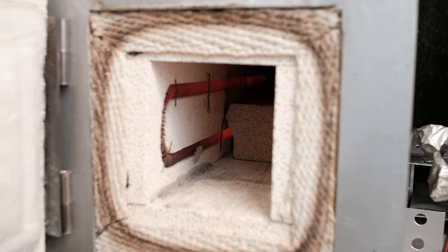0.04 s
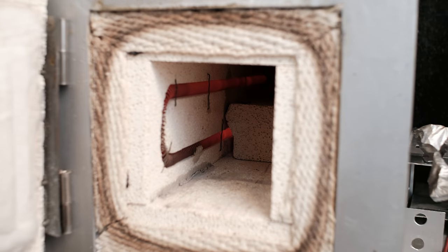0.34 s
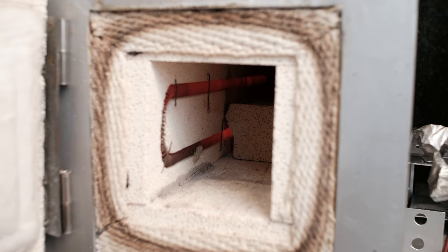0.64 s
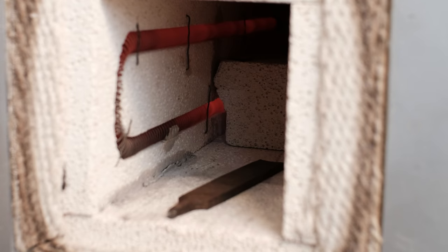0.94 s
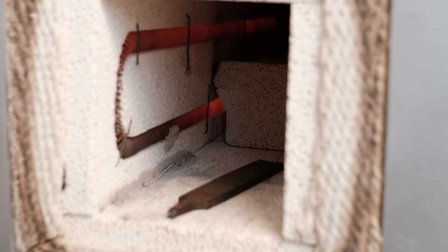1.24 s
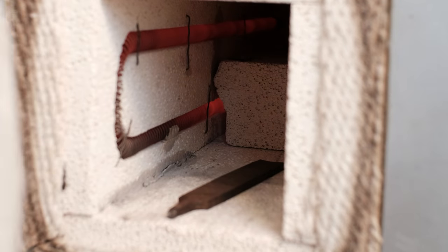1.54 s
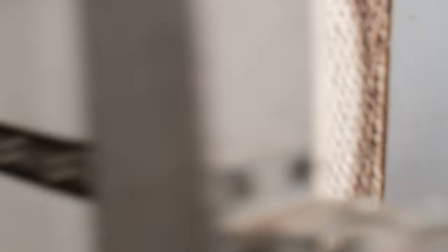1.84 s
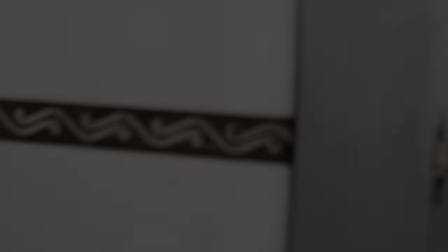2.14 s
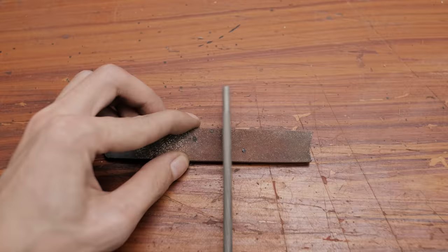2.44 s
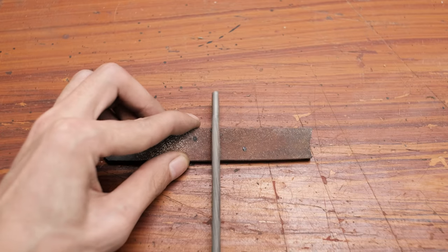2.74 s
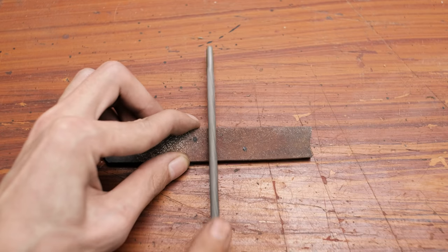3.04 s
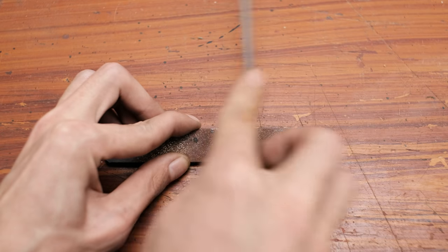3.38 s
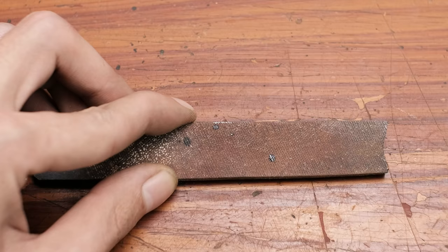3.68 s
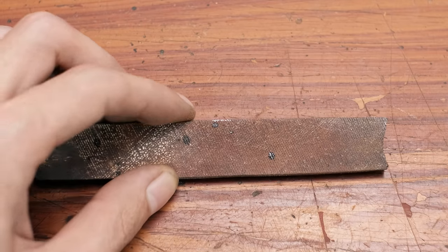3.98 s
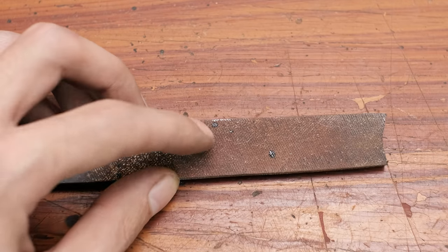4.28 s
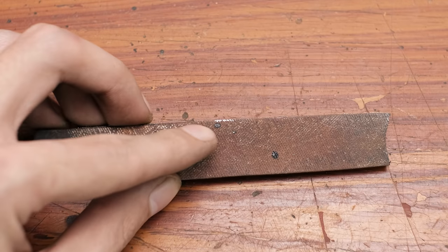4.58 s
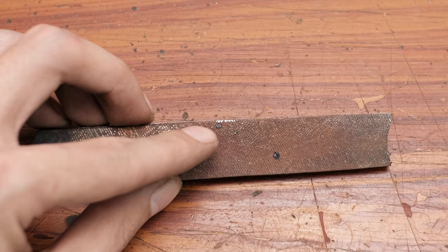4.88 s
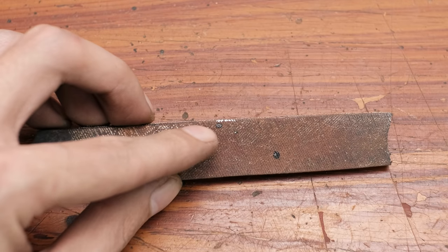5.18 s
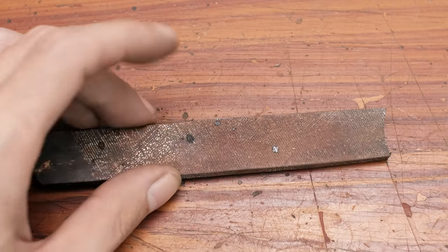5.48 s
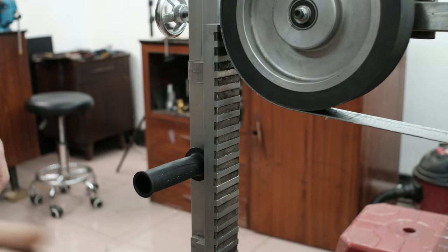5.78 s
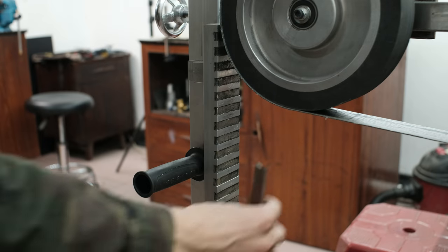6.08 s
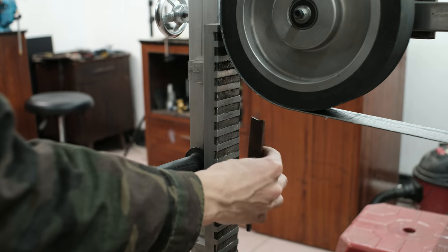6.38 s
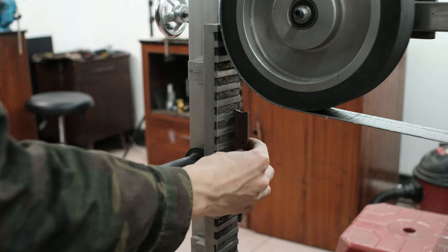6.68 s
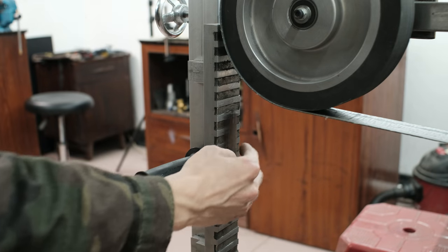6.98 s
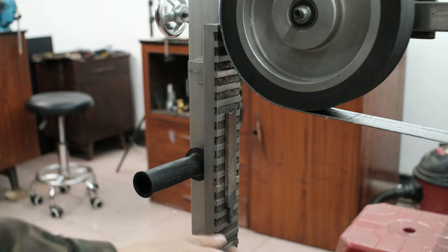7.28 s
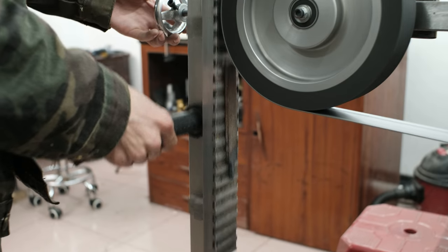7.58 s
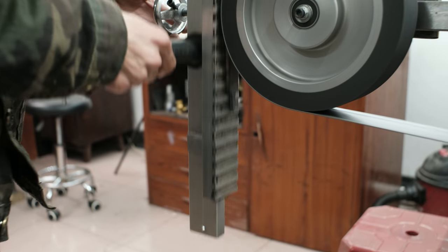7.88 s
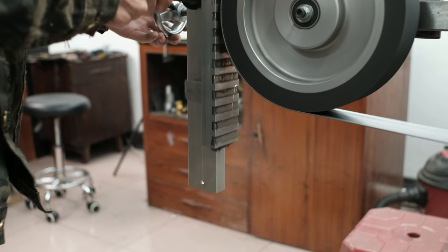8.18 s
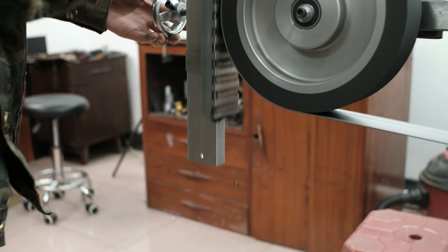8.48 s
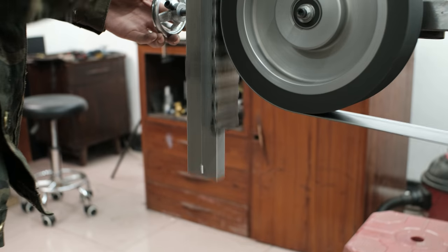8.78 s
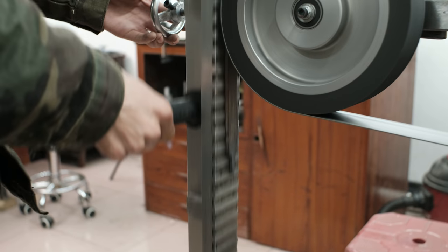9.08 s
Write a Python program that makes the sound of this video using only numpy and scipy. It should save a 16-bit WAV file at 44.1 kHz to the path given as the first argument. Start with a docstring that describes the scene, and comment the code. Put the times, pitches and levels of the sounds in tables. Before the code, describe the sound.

In a small workshop, a sleeve rustles faintly and a piece of steel bounces and rings on a kiln's brick floor. A brief squeak and a soft door swish follow. A round file rasps once across steel on a wooden bench, then come two light knocks. The steel snaps onto a magnetic slide with two sharp clacks. A belt grinder starts abruptly, rushing loudly over motor hum, and cuts twice with hiss and chatter.

```python
"""Knife making in a small workshop. Sleeve and hand rustle faintly; a piece of an old file bounces and
rings on a kiln's brick floor. A short squeak; the door swings shut with a swish and a low gust. On a
wooden bench a round file rasps once across the steel, and fingers set it straight with two knocks.
A sleeve swishes and the steel snaps onto the magnetic slide of a belt grinder. The belt starts, rushing
over motor hum, and its grit bites the steel on two passes with hiss and chatter."""
import sys
import numpy as np
from scipy import signal
from scipy.fft import rfft, irfft
from scipy.io import wavfile
from scipy.ndimage import map_coordinates

SR = 44100
rng = np.random.default_rng(int(sys.argv[2]) if len(sys.argv) > 2 else 0)


def master_out(mix):
    """Clip the mix to full scale and print it as 16-bit PCM to the path in sys.argv[1]."""
    frames = np.transpose(np.atleast_2d(mix))
    ceiling = np.clip(frames, -1, 1)
    pcm = np.round(ceiling * 32767).astype(np.int16)
    wavfile.write(sys.argv[1], SR, pcm)


N = 407043
TIME = np.arange(N) / SR

# background at kiln, bench, grinder: (air [dB], rumble [dB])
BACKGROUNDS = [(-65, -58), (-71, -71.5), (-68.5, -62.5)]
# room air: (frequency [Hz], density [dB])
AIR_SPECTRUM = [(60, -9.5), (110, -6.5), (300, -9.5), (450, -13.5), (1200, -16), (1700, -23.5), (2800, -31),
                (6000, -34.5), (11500, -40), (13000, -49.5), (15500, -48)]
# low rumble: (frequency [Hz], density [dB])
RUMBLE_SPECTRUM = [(12, -2), (28, 9), (55, 1.5), (90, -6.5), (160, -27), (400, -54.5)]
# workshop reverberation: (frequency [Hz], t60 [s])
ROOM_T60 = [(150, 0.58), (900, 0.34), (2200, 0.21), (5000, 0.33), (9000, 0.26), (15000, 0.21)]

# sleeve and hand at the kiln, door, sleeve at the grinder: (peak [s], rise [s], fall [s], level [dB])
KILN_RUSTLES = [(.03, .1, .13, -78), (.38, .135, .19, -68.5), (.68, .098, .075, -70)]
DOOR_SWISHES = [(1.745, .16, .14, -65), (2.045, .086, .1, -57)]
SLEEVE_SWISHES = [(5.79, .09, .085, -61.5), (6.02, .09, .1, -68), (6.23, .21, .19, -65.5)]
# rustles and swishes at the kiln: (frequency [Hz], density [dB])
SWISH_SPECTRUM = [(710, -35), (1200, -1.5), (2360, -2), (3770, -5), (4980, -1.5), (9370, -16.5),
                  (15500, -29)]
# sleeve at the grinder: (frequency [Hz], density [dB])
CLOTH_SPECTRUM = [(710, -27.5), (1200, -4.5), (1700, -3.5), (1850, 0), (2080, -4.5), (5320, -3.5),
                  (15000, -25.5)]
# handling ticks: (time [s], level [dB])
TICKS = [(2.209, -40), (5.688, -34.5), (5.731, -33)]

# steel on kiln brick: (time [s], thud [dB], relative ring [dB], relative tick [dB])
KILN_BLOWS = [(0.7782, -9, -45, -28.5), (0.7878, -41, -35.5, -9.5), (0.7895, -5.5, -23, -16),
              (0.7943, -19, -44, -16), (.847, -15.5, -42.5, -25), (0.8523, -11, -26, -20),
              (0.86, -17, -59, -33), (.879, -19, -46, -34.5)]
# free steel: (frequency [Hz], gain [dB], t60 [s], choking by the brick [0-1])
FREE_STEEL_MODES = [(1420, -21, 0.67, 0.54), (1822, -19.5, .2, 0), (1840, -27.5, .3, 0.7),
                    (3512, 1.5, 0.8, 0.87), (5420, -18.5, 0.9, 0.36), (5660, -12, 0.36, .3),
                    (6140, -6, 0.37, 0.42), (9520, -11, 0.37, 1), (11200, -27, .35, 0.6),
                    (14050, -23.5, .3, .4)]
# brick thud: (frequency [Hz], density [dB])
BRICK_SPECTRUM = [(60, -26.5), (150, -8.5), (300, -8.5), (450, 4), (620, 5.5), (950, -8.5), (1400, -8.5),
                  (1800, -8.5), (2600, -16.5), (5000, -32), (15000, -60)]
# gritty tick on brick: (frequency [Hz], density [dB])
TICK_SPECTRUM = [(1000, -4.5), (3000, -1), (7000, 3.5), (11000, -11.5), (15500, -11.5)]

# two nudges, then the file: (start [s], end [s], relative push [dB], scrape [dB], bite [dB])
BENCH_STROKES = [(2.239, 2.298, -46.5, -53.5, -77), (2.305, 2.412, -54, -52, -64),
                 (2.813, 3.339, -24, -24.5, -36)]
# file catches (+) and skips (-): (time [s], gain [dB])
CATCHES = [(2.965, 4), (3.015, 2.5), (3.035, -6), (3.056, 6), (3.074, -8), (3.095, 7.5), (3.12, -5),
           (3.165, 2), (3.212, 1), (3.295, 4.5)]
# knocks on the bench: (time [s], relative wood [dB], relative steel [dB])
KNOCKS = [(2.258, -28.5, -65), (2.722, -35, -74), (2.7599, -20, -24), (2.831, -30.5, -34),
          (3.797, -37.5, -66), (3.9299, -14.5, -54), (3.949, -24, -65), (4.091, -34, -60),
          (4.0977, -20, -60)]
# wooden top: (frequency [Hz], width [Hz], gain [dB])
BENCH_MODES = [(196.6, 25, -0.5), (253, 53, -6), (362, 54, -1), (435, 43, 3.5), (494, 46, 1),
               (585.6, 21, -3.5), (679, 29, 2), (778, 44, -3), (940, 74, -4.5), (1235, 110, -9.5),
               (1479, 47, -10), (1750, 140, -19.5), (2220, 170, -22.5)]
# steel held on the bench: (frequency [Hz], width [Hz], gain [dB])
HELD_STEEL_MODES = [(3548, 60, 7.5), (4710, 200, -18), (5400, 450, -21.5), (6220, 53, -14),
                    (9600, 60, -12.5), (11460, 100, -20), (14200, 130, -35.5)]
# midrange scrape of the file: (frequency [Hz], density [dB])
SCRAPE_SPECTRUM = [(300, -24), (700, -0.5), (1100, 1), (1600, 4), (2200, -10.5), (3000, -14.5),
                   (5000, -25.5), (15000, -60.5)]
# bright rasp of the steel: (frequency [Hz], density [dB])
RASP_SPECTRUM = [(1500, 3), (2700, -10), (4500, -1.5), (6200, -12), (8000, -10.5), (11500, -24),
                 (13000, -27.5), (15500, -34.5)]
# soft fingertip knock: (frequency [Hz], density [dB])
FINGER_SPECTRUM = [(100, 1.5), (400, 0), (650, -10.5), (1200, -14), (5000, -15)]

# steel onto the magnet: (time [s], edge [dB], face [dB])
SNAPS = [(6.5595, 4, -36), (6.5762, 9, -9), (6.584, -2, -16.5), (7.0608, -14, 13), (7.0658, -17.5, -1)]
# steel on the slide: (frequency [Hz], width [Hz], edge gain [dB], face gain [dB])
SLIDE_MODES = [(480, 140, -6.5, -6.5), (600, 92, -2, -4.5), (864, 160, 1, -2.5), (1430, 230, 0, -5),
               (1860, 190, 1.5, -6.5), (2830, 800, -2.5, -3.5), (3670, 270, 3.5, -4.5), (4706, 207, 5, 0.5),
               (5600, 270, -1, -6.5), (6370, 170, -8, 4.5), (7020, 390, -6, -0.5), (7880, 710, -9.5, -4),
               (8250, 750, -12, -8), (9620, 280, -11.5, 2.5), (10620, 330, -18, -6),
               (11440, 140, -6.5, -3.5), (13100, 380, -35, -11), (14000, 350, -37, -12)]
# long rings of the slide's frame: (frequency [Hz], width [Hz], edge gain [dB], face gain [dB])
SLIDE_FRAME_MODES = [(187, 6.2, -2, -12.5), (318, 5.5, 1, -5), (570, 5, -8, -0.5), (875, 6.8, -1.5, 1.5),
                     (1030, 6, -2.5, -3.5), (1830, 2.5, -5.5, -21), (3680, 7, 5, -17.5),
                     (4830, 8.2, -2.5, -14), (5800, 6.1, -2.5, -22), (6700, 14, -14, 3)]
# heavy frame under edge and face blows: (frequency [Hz], density [dB])
KNOCK_SPECTRUM = [(60, -33), (170, 2.5), (300, 2.5), (1300, -9), (2200, -5.5), (6000, -22.5),
                  (15000, -39.5)]
THUMP_SPECTRUM = [(25, -3), (55, 7), (130, -8), (350, -1), (2500, 1), (10000, -20), (15000, -22.5)]

# belt rush: (frequency [Hz], density [dB])
BELT_SPECTRUM = [(35, -56), (60, -20), (96, -5.5), (135, -14), (196, -2.5), (259, -12), (385, -5.5),
                 (572, -15.5), (642, -10), (705, -10), (1050, -8), (2470, -11), (5080, -7), (10700, -18.5),
                 (15500, -35.5)]
# platen and wheel housing: (frequency [Hz], width [Hz], gain [dB])
HOUSING_MODES = [(161, 30, -1), (225.7, 6.1, 4.5), (390, 18, -13), (930, 570, -3.5), (3530, 90, -9.5),
                 (3890, 290, 5.5), (4620, 300, 0), (4927, 70, 10.5), (5300, 250, 4), (5710, 43, 10.5),
                 (5940, 98, 6)]
# motor, wheel and bearing tones: (frequency [Hz], rms level [dB])
MOTOR_TONES = [(33.1, -73), (99, -52), (660, -56), (753, -59.5), (802, -57.5), (1024, -55.5), (1109, -63.5),
               (4968, -74), (5828, -51)]
# contact wheel drone: (time [s], relative level [dB])
DRONE_LEVELS = [(7.42, -46), (7.538, -57), (7.568, -43), (7.904, -46), (7.93, -60), (8.018, -45),
                (8.078, -67), (8.248, -47.5), (8.59, -45.5), (8.624, -60), (8.714, -41), (8.882, -41.5),
                (8.922, -62), (9.2, -42)]
# steel against the belt: (start [s], end [s], first pressure [0-1], last pressure [0-1])
PASSES = [(7.998, 8.493, .22, .74), (8.855, 8.98, 0.58, 0.34)]
# belt snatches at the steel: (time [s], level [dB])
SNATCHES = [(8.126, -19), (8.275, -16), (8.388, -0.5), (8.455, -13), (8.505, -22), (8.878, -5),
            (8.951, -21)]
# grit cutting steel: (frequency [Hz], density [dB])
CUTTING_SPECTRUM = [(500, -3), (1500, -1.5), (4000, 6), (7000, 3), (10500, -2.5), (12300, -12), (13300, -6),
                    (15500, -11)]

BELT_START_S, LAPS_PER_S = 7.384, 11.78


def amp(db):
    """Decibels to gain."""
    return 10 ** (np.asarray(db) / 20)


def unit_rms(x):
    """Scale to rms 1."""
    return x / np.sqrt(np.mean(x ** 2) + 1e-20)


def ramp(start_s, length_s):
    """Linear rise from 0 to 1."""
    return np.clip((TIME - start_s) / length_s, 0, 1)


def since(time_s):
    """Seconds elapsed; 0 before."""
    return np.maximum(TIME - time_s, 0)


def swell(peak_s, rise_s, fall_s):
    """Bell of height 1; -10 dB at rise_s before and fall_s after the peak."""
    away = (TIME - peak_s) / np.where(TIME < peak_s, rise_s, fall_s)
    return amp(-10 * np.minimum(away ** 2, 20))


def drift(rate_hz):
    """Smooth random wander, rms 1."""
    knots = rng.standard_normal(4000)
    wander = map_coordinates(knots, [TIME[::50] * rate_hz], order=3, mode="wrap")
    return unit_rms(wander).repeat(50)[:N]


def at_hz(points, hz):
    """Interpolate over log frequency."""
    known_hz, values = np.transpose(points)
    return np.interp(np.log(np.maximum(hz, 1)), np.log(known_hz), values)


def butter(x, order, edge_hz, kind):
    """Butterworth filter."""
    return signal.sosfilt(signal.butter(order, edge_hz, kind, fs=SR, output="sos"), x)


def convolve(x, response):
    """Apply an impulse response scaled to unit energy."""
    return signal.oaconvolve(x, response / np.linalg.norm(response))[:N]


def colour(x, spectrum, size=8192):
    """Minimum-phase filter with the spectrum's shape."""
    hz = np.arange(size // 2 + 1) * SR / size
    cepstrum = irfft(np.log(amp(at_hz(spectrum, hz))))
    cepstrum[1:size // 2] *= 2
    cepstrum[size // 2 + 1:] = 0
    return convolve(x, irfft(np.exp(rfft(cepstrum))))


def resonate(x, modes, size=8192):
    """Drive damped modes of alternating sign."""
    t = TIME[:size]
    response = sum((-1) ** k * amp(db) * width_hz * np.exp(-np.pi * width_hz * t)
                   * np.sin(2 * np.pi * hz * t) for k, (hz, width_hz, db) in enumerate(modes))
    return convolve(x, response)


def blows(times_s, levels_db, crunch, crunch_s, size=1024):
    """Per blow, a click and a short crunch of tiny contacts."""
    out, t = np.zeros(N), TIME[:size]
    window = t < min(5 * crunch_s, .75 * t[-1])
    for time_s, db in zip(times_s, levels_db):
        force = rng.standard_normal(size) * np.exp(-t / crunch_s)
        force *= crunch / np.linalg.norm(force)
        force[0] += 1
        for _ in range(3):   # whiten: the struck body alone sets the colour
            force = irfft(np.exp(1j * np.angle(rfft(force)))) * window
        at = round(time_s * SR)
        out[at:at + size] += amp(db) * force / np.linalg.norm(force)
    return out


def grains(per_s, spread_db):
    """Random tiny impacts of uneven size, rms 1."""
    sizes = amp(spread_db * np.minimum(rng.exponential(1, N), 4)) * rng.choice([-1, 1], N)
    return unit_rms(sizes * (rng.random(N) < per_s / SR))


def workshop(x, wet_db, size=32768):
    """Direct sound plus a diffuse tail decaying band by band."""
    t, hz = TIME[:size], np.arange(size // 2 + 1) * SR / size
    white, tail = rfft(rng.standard_normal(size)), 0
    edges_hz = np.geomspace(70, 17000, 13)
    for low, high in zip(edges_hz, edges_hz[1:]):
        band = irfft(white * (hz >= low) * (hz < high))
        tail += band * amp(-60 * t / at_hz(ROOM_T60, np.sqrt(low * high)))
    return x + amp(wet_db) * convolve(x, tail * ramp(0, .008)[:size])


def air(moves_s=(2.4, 5.6), fade_s=.22):
    """Room hush and lumpy rumble, levels set per place; the closing door pushes a low gust."""
    place = sum(ramp(time_s - fade_s / 2, fade_s) for time_s in moves_s)
    air_db, rumble_db = [np.interp(place, [0, 1, 2], column) for column in np.transpose(BACKGROUNDS)]
    gust = amp(-54) * swell(peak_s=2.21, rise_s=.13, fall_s=.13)
    hush = amp(air_db) * colour(rng.standard_normal(N), AIR_SPECTRUM)
    rumble_gain = np.hypot(amp(rumble_db), gust) * amp(2 * drift(11))
    return hush + rumble_gain * colour(rng.standard_normal(N), RUMBLE_SPECTRUM)


def swish_gain(swishes):
    """Power sum of swells."""
    return np.sqrt(sum((amp(db) * swell(peak_s, rise_s, fall_s)) ** 2
                       for peak_s, rise_s, fall_s, db in swishes))


def handling():
    """Sleeve, hand and door at the kiln, brighter when louder; a sleeve at the grinder; light ticks."""
    at_kiln, at_grinder = swish_gain(KILN_RUSTLES + DOOR_SWISHES), swish_gain(SLEEVE_SWISHES)
    friction = grains(14000, spread_db=3)
    ticks = blows(*np.transpose(TICKS), crunch=3, crunch_s=.003)
    treble = unit_rms(butter(colour(rng.standard_normal(N), SWISH_SPECTRUM), 4, 6000, "high"))
    whisk = amp(-3.5) * at_kiln ** 2 / at_kiln.max() * treble
    cloth = colour(at_grinder * friction + ticks, CLOTH_SPECTRUM)
    return at_kiln * colour(friction, SWISH_SPECTRUM) + whisk + cloth


def steel_on_brick(rocks_s=.85, flat_s=.876, rocking_db_per_s=399.5, choke_db=29.5):
    """Bounces on soft brick: thud, gritty tick, and a ring choked as the steel rocks, then lies flat."""
    times_s, thud_db, ring_db, tick_db = np.transpose(KILN_BLOWS)
    size = 2 * SR
    t = TIME[:size]
    strikes = blows(times_s, ring_db, crunch=0, crunch_s=.003)[:size]
    loss_db = rocking_db_per_s * (since(rocks_s) - since(flat_s)) + choke_db * ramp(flat_s, .00856)
    ring = np.zeros(N)
    for hz, db, t60_s, choking in FREE_STEEL_MODES:
        mode = amp(db - 60 * t / t60_s) * np.sin(2 * np.pi * hz * t)
        ring[:size] += signal.fftconvolve(strikes, mode)[:size] * amp(-3 - choking * loss_db[:size])
    thud = colour(blows(times_s, thud_db, crunch=1.4, crunch_s=.0085), BRICK_SPECTRUM)
    tick = amp(-2.5) * colour(blows(times_s, tick_db, crunch=3, crunch_s=.0023), TICK_SPECTRUM)
    return workshop(ring + thud + tick, wet_db=-14.5)


def squeak(start_s=1.283, pitch_hz=3580, sharp_hz=330, settle_s=.0068, fade_db_per_s=480):
    """Whistle with two overtones: starts sharp, settles, stutters as it dies."""
    age_s = since(start_s)
    hz = pitch_hz + sharp_hz * np.exp(-age_s / settle_s) + 35 * drift(180)
    level_db = -41.5 - fade_db_per_s * np.minimum(age_s, 1) + 2.5 * drift(180)
    phase = 2 * np.pi * np.cumsum(hz) / SR
    tone = np.sin(phase) + amp(-10.5) * np.sin(2 * phase) + amp(-34) * np.sin(3 * phase)
    return workshop(ramp(start_s, .0096) * amp(level_db) * tone, wet_db=-5)


def stroke_gains(seat_db=20.5, ease_db=11, lift_db_per_s=852.5, shudder_db_per_s=139):
    """Push, scrape, bite: a stroke seats, speeds up, eases and lifts; catches jolt the bite most."""
    push = scrape = bite = 0
    for start_s, end_s, push_db, scrape_db, bite_db in BENCH_STROKES:
        length_s, after_s = end_s - start_s, np.minimum(since(end_s), 1)
        to_go = 1 - ramp(start_s, length_s)
        seat = ramp(start_s, .01) * amp(seat_db * (ramp(start_s, .22 * length_s) - 1))
        shudder = amp(-27 - shudder_db_per_s * after_s)
        contact = seat * np.maximum(amp(-lift_db_per_s * after_s), shudder)
        eased = ramp(start_s + .78 * length_s, .02)
        push += contact * amp(push_db - 15.5 * to_go - ease_db * eased)
        scrape += contact * amp(scrape_db - 10 * to_go)
        bite += contact * amp(bite_db - 16.5 * to_go)
    jolt = amp(sum(db * swell(time_s, .011, .011) for time_s, db in CATCHES))
    return push * jolt, scrape * jolt, bite * jolt ** 1.2


def bench_work():
    """File teeth and finger knocks shake the bench top and ring the steel held on it."""
    push, scrape, bite = stroke_gains()
    catching = amp(drift(160) - .07)
    teeth = grains(12000, spread_db=2) * catching
    chips = grains(2700, spread_db=5.5) * catching
    times_s, wood_db, steel_db = np.transpose(KNOCKS)
    fingers = colour(blows(times_s, wood_db, crunch=1, crunch_s=.0062), FINGER_SPECTRUM)
    knocks = amp(-9) * resonate(fingers, BENCH_MODES)
    low = amp(1.44) * resonate(push * teeth, BENCH_MODES[:5])
    high = amp(-2) * resonate(scrape * teeth, BENCH_MODES[5:])
    wood = butter(low + high + knocks, 2, 125, "high")   # deep bass cut from the bench sound
    file = amp(-14) * colour(scrape * chips, SCRAPE_SPECTRUM)
    taps = blows(times_s, steel_db, crunch=.93, crunch_s=.0026)
    ring = amp(-.4) * resonate(bite * teeth + taps, HELD_STEEL_MODES)
    rasp = amp(-8) * colour(bite * chips + taps, RASP_SPECTRUM)
    return workshop(wood + file, wet_db=-13) + workshop(ring + rasp, wet_db=-19.5)


def magnet_snaps():
    """The magnet pulls the steel in: an edge lands and bounces, later the face slaps down."""
    times_s, edge_db, face_db = np.transpose(SNAPS)
    edge = blows(times_s, edge_db, crunch=3, crunch_s=.0042)
    face = blows(times_s, face_db, crunch=8.8, crunch_s=.0031)

    def struck(modes):
        """Same modes, separate gains for edge and face."""
        hz, width_hz, on_edge_db, on_face_db = np.transpose(modes)
        return (resonate(edge, zip(hz, width_hz, on_edge_db), size=32768)
                + resonate(face, zip(hz, width_hz, on_face_db), size=32768))

    ring = struck(SLIDE_MODES) + amp(-21.5) * struck(SLIDE_FRAME_MODES)
    knock = amp(-22) * colour(edge, KNOCK_SPECTRUM)
    thump = amp(-14) * colour(face, THUMP_SPECTRUM)
    return workshop(ring + knock + thump, wet_db=-4)


def belt_noise(laps, repeat_share):
    """The same grit returns each lap, mixed with fresh noise."""
    lap = rng.standard_normal(round(SR / LAPS_PER_S))
    grit = unit_rms(map_coordinates(lap, [laps % 1 * len(lap)], order=3, mode="grid-wrap"))
    return np.sqrt(repeat_share) * grit + np.sqrt(1 - repeat_share) * rng.standard_normal(N)


def belt(run_s):
    """The belt rushes over its wheels and rings the housing; a thin whistle swings once a lap."""
    laps = LAPS_PER_S * run_s
    flutter = 1 + .12 * np.sin(2 * np.pi * 247.5 * run_s) + .088 * np.sin(2 * np.pi * 82.5 * run_s)
    rush = amp(-34.5) * colour(belt_noise(laps, repeat_share=.44) * flutter, BELT_SPECTRUM)
    housing = amp(-37.5) * resonate(belt_noise(laps, repeat_share=.43) * flutter, HOUSING_MODES)
    whistle_hz = 3950 + 170 * np.sin(2 * np.pi * laps) + 50 * drift(200)
    whistle = amp(-50 + 3 * drift(45)) * np.sin(2 * np.pi * np.cumsum(whistle_hz) / SR)
    return rush + housing + whistle


def motor_hum(run_s):
    """Motor, wheel and bearing tones, wavering in level and phase."""
    return sum(np.sqrt(2) * amp(db + 1.6 * drift(10)) * np.sin(2 * np.pi * hz * run_s + .5 * drift(9))
               for hz, db in MOTOR_TONES)


def wheel_drone(run_s, hz=197, gain_db=1):
    """The contact wheel's tone swells and fades."""
    level_db = np.interp(TIME, *np.transpose(DRONE_LEVELS)) + gain_db
    return amp(level_db) * np.sin(2 * np.pi * hz * run_s + .5 * drift(5.5))


def belt_pressure(press_s=.014, release_s=.0245, snatch_s=.02234):
    """Steel on belt: linear along a pass, with a bump at each snatch."""
    held = 0
    for start_s, end_s, first, last in PASSES:
        lean = first + (last - first) * ramp(start_s, end_s - start_s)
        held += ramp(start_s, press_s) * lean * np.exp(-since(end_s) / release_s)
    return held + .2485 * sum(swell(time_s, snatch_s, snatch_s) for time_s, _ in SNATCHES)


def cutting(pressure):
    """Grit tears at the steel with a hiss; pressed hard, the steel chatters on its slide."""
    grit = grains(12000, spread_db=4) * amp(1.1 * drift(90))
    hiss = amp(-31) * np.sqrt(pressure) * colour(grit, CUTTING_SPECTRUM)
    chatter = amp(-27.5) * pressure ** 2 * grains(2500, spread_db=2) * amp(2.2 * drift(110))
    snatches = blows(*np.transpose(SNATCHES), crunch=5.2, crunch_s=.0042)
    softened = butter(chatter + snatches, 1, [700, 1900], "band")   # the belt yields
    edge_modes = [row[:3] for row in SLIDE_MODES]
    return hiss + resonate(softened, edge_modes)


def grinder():
    """Belt, motor and wheel start at once and share one speed; pressure slows them slightly."""
    pressure = belt_pressure()
    speed = 1 - .012 * pressure + .0004023 * drift(4)
    run_s = np.cumsum(speed) / SR
    grinding = workshop(belt(run_s) + cutting(pressure), wet_db=-15.5)
    return ramp(BELT_START_S, .00083) * (grinding + motor_hum(run_s) + wheel_drone(run_s))


def scene():
    """Mono mix on both channels."""
    mono = steel_on_brick() + squeak() + handling() + bench_work() + magnet_snaps() + grinder() + air()
    return np.stack([mono, mono])


def record(dry):
    """Soft clip, then a steep low-pass."""
    cutoff_hz = 15900
    return signal.sosfilt(signal.ellip(10, .1, 80, cutoff_hz, fs=SR, output="sos"), np.tanh(dry))


dry = scene()
out = record(dry)
master_out(out)
```